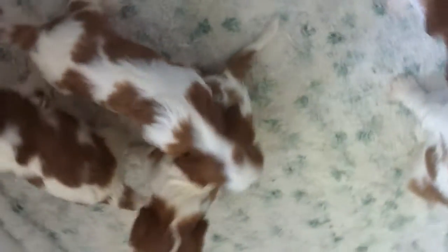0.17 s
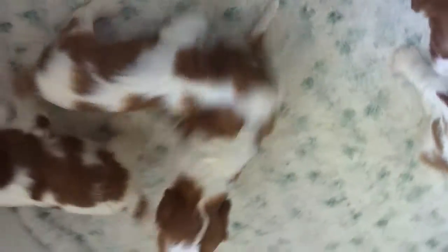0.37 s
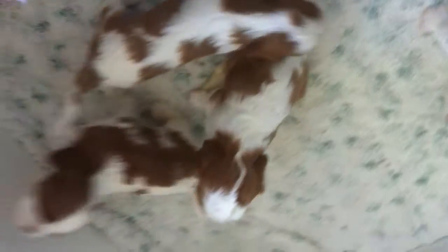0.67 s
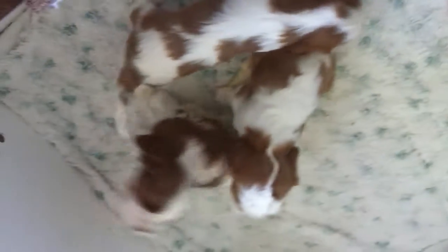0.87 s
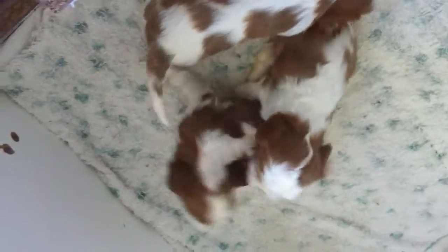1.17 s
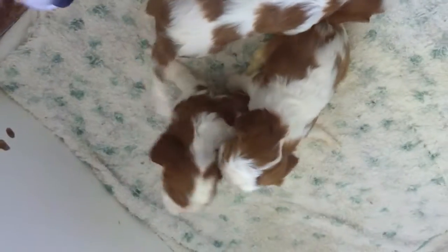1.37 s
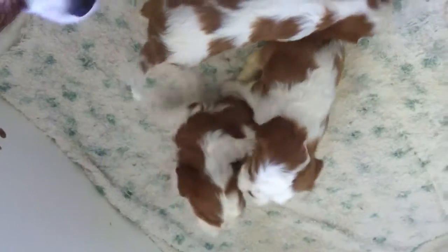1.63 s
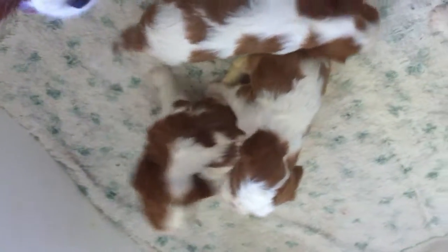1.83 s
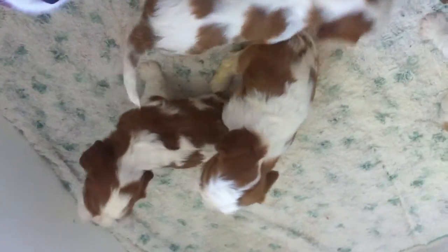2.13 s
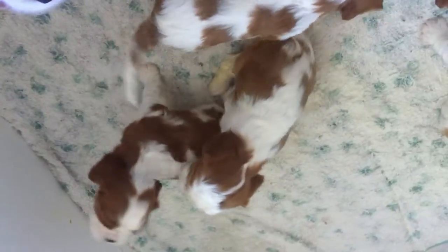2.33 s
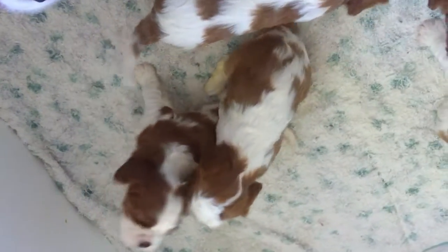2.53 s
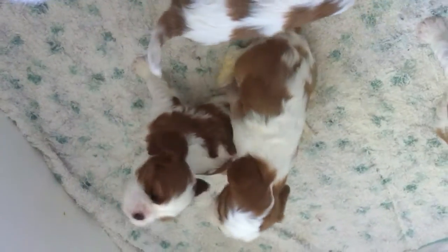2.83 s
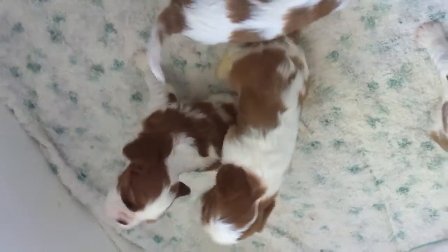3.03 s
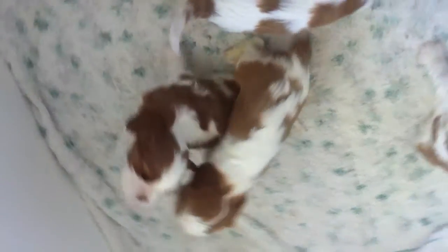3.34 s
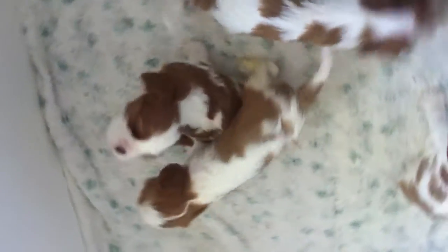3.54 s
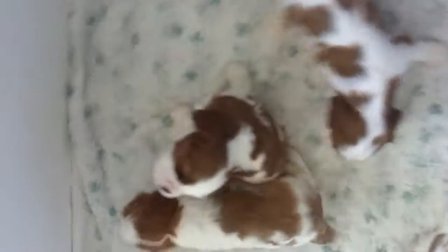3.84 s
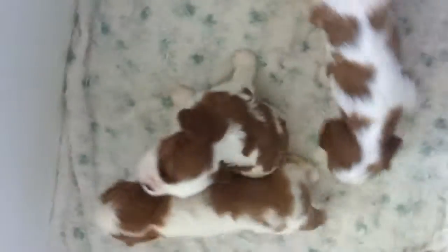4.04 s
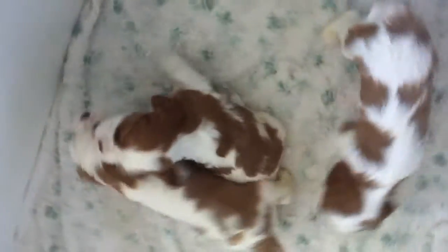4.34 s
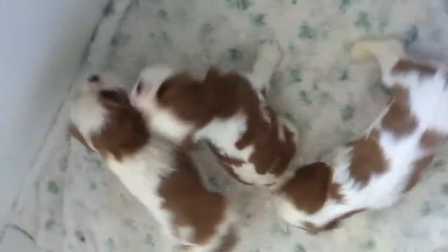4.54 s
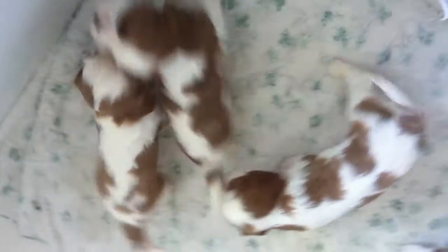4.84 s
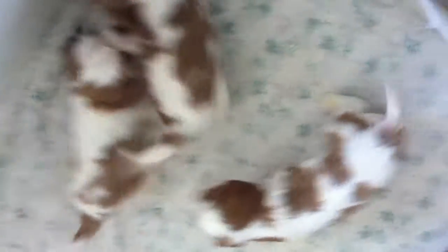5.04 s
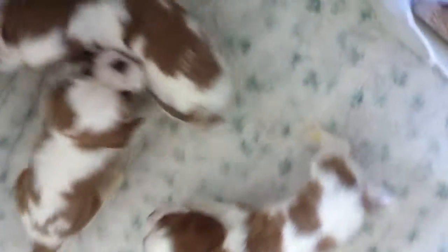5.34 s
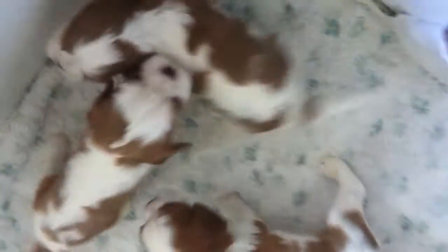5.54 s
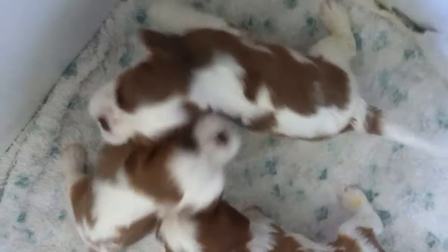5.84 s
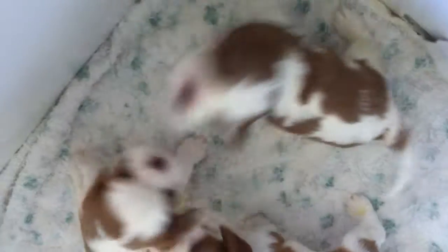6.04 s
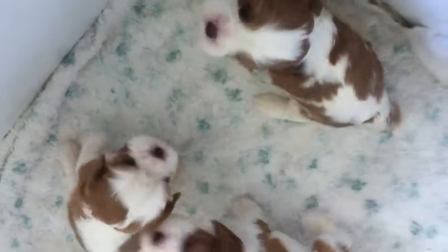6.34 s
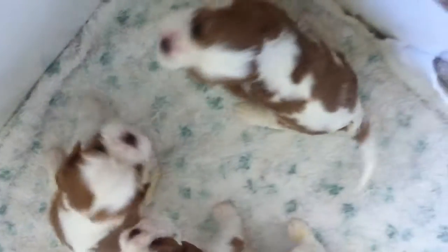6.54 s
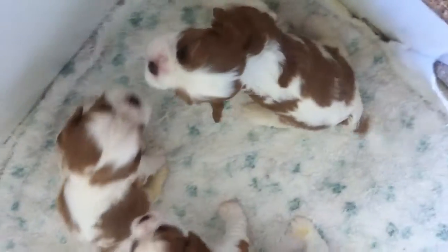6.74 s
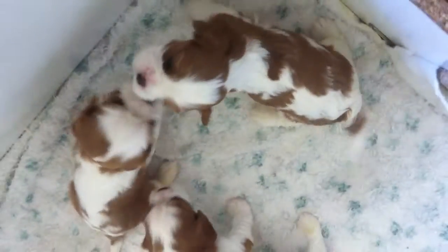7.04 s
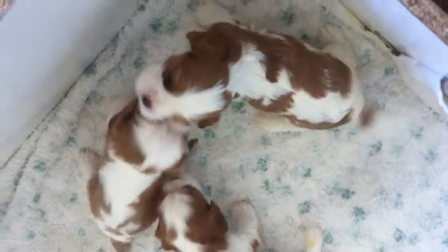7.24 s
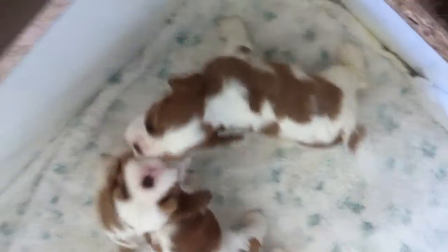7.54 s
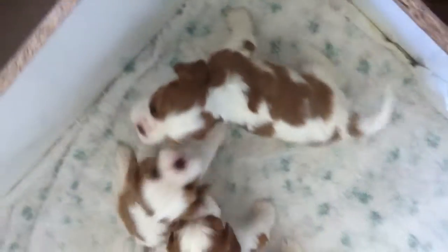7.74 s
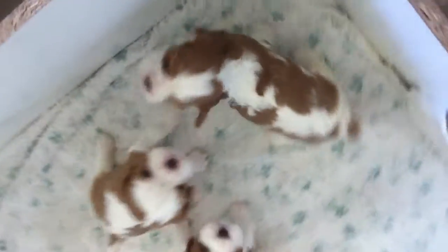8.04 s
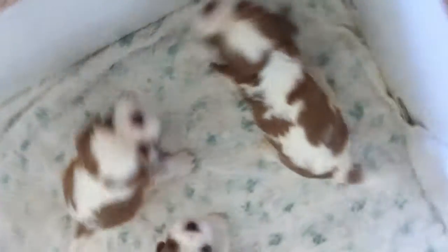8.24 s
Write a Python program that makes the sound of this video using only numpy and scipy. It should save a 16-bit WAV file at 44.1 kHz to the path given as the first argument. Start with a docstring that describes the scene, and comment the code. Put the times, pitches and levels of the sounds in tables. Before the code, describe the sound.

Young puppies squeal, yip and grunt close by, with quick breaths, soft shuffling on a blanket and a few sharp knocks.

```python
"""Young puppies cry, yip and pant in a whelping box indoors, the microphone just above them.
One squeals high at first, then they grunt and yelp: vocal folds buzz through the mouth,
and air rushes noisily through small airways between cries. Paws thud and scuff on the blanket
and a few sharp knocks ring briefly. The box walls throw the cries and bumps straight back,
with the short tail and still air of a furnished room behind."""
import sys
import numpy as np
from scipy import signal
from scipy.fft import rfft, irfft, next_fast_len
from scipy.io import wavfile
from scipy.ndimage import uniform_filter1d

SR = 44100
rng = np.random.default_rng(int(sys.argv[2]) if len(sys.argv) > 2 else 0)


def wav_record(signal):
    """Record a signal, one row per channel, as 16-bit PCM in the file named by sys.argv[1]."""
    frames = np.transpose(np.atleast_2d(signal))
    bounded = np.clip(frames, -1, 1)
    # unit amplitude maps onto the largest positive 16-bit level
    quanta = np.round(bounded * 32767).astype(np.int16)
    wavfile.write(sys.argv[1], SR, quanta)


N = 370440
TIME = np.arange(N) / SR
LOW_CUT_HZ, BAND_LIMIT_HZ = 38, 15750

# The still room behind the box. Each row: frequency in Hz, relative level in dB.
ROOM_TONE = [(25, -40), (65, -35), (140, 2.5), (250, -4.5), (600, -5), (1400, -7.5), (2400, -4), (3700, -7),
             (8000, -12.5), (15700, -20)]
# The room's tail. Each row: frequency in Hz, seconds to die by 60 dB.
ROOM_T60 = [(150, 0.27), (1000, 0.42), (2500, 0.5), (8000, 0.34), (15000, 0.022)]
# Box walls close around the microphone. Each row: delay in seconds, gain.
WALL_ECHOES = [(.0017, 0.65), (.0034, -0.0078), (.0056, 0.013), (.0093, 0.071), (0.0145, -.1),
               (0.02, -0.057)]

# Rumble of bodies and hiss of cloth. Each row: frequency in Hz, relative level in dB.
SHUFFLE_COLOUR = [(25, -33), (60, -52), (85, -15.5), (160, -4), (280, 1), (500, -8.5), (1000, -5),
                  (3000, -33)]
SCUFF_COLOUR = [(200, -9), (1000, 2.5), (2400, 3), (4000, -4.5), (6000, 0.5), (8200, 1), (11000, 1),
                (13500, -2.5), (15800, -5)]
# A body shifts. Each row: peak time and length in seconds, relative rumble and hiss in dB.
BODY_SHIFTS = [(0.096, 0.24, -89, -75), (0.58, 0.26, -71, -55.5), (1.162, 1, -68.5, -61.5),
               (1.734, 0.32, -71.5, -68.5), (2.924, 0.61, -68, -67), (3.619, 0.81, -83, -60.5),
               (4.245, 0.91, -68, -67.5), (4.804, 0.83, -68.5, -69.5), (5.355, 0.76, -61, -61.5),
               (6.2, 0.72, -69, -63), (7.191, 0.41, -80, -68), (7.807, 0.4, -62.5, -63),
               (8.292, 1, -69, -56.5)]
# A paw swipes the cloth. Each row: peak time in seconds, level in dB, half-length in seconds.
PAW_SWIPES = [(1.403, -53, 0.18), (3.46, -68, 0.012), (5.838, -54, 0.085), (6.324, -59, 0.024),
              (7.646, -64.5, 0.11), (8.13, -55, 0.022), (8.333, -46.5, 0.065)]
# Paws and bodies land. Each row: start in seconds, level in dB, pitch in Hz.
THUDS = [(.486, -51, 240), (0.613, -59, 210), (0.863, -50, 161), (0.913, -61, 85), (2.545, -59, 215),
         (2.677, -54.5, 368), (4.553, -56.5, 240), (5.122, -69, 105), (5.332, -48.5, 164),
         (5.839, -51, 172), (7.686, -49, 328), (7.738, -59, 261), (8.128, -57, 294), (8.22, -52, 240)]
# Hard knocks and claw taps. Each row: start in seconds, level in dB, hardness in dB per octave.
KNOCKS = [(.195, -63, 0), (1.213, -41, -11), (4.931, -47, -2), (5.212, -45, 16), (5.328, -23, 2),
          (5.408, -38.5, -4), (5.795, -58, -14), (6.575, -42.5, -6), (8.023, -47, 30)]
# The ring of a knock. Each row: frequency in Hz, relative level in dB, seconds to die by 60 dB.
KNOCK_MODES = [(1250, -12, .012), (2315, -5, .016), (2850, -5, .014), (4161, 0, .013), (4600, -3, .009),
               (5150, -2, .009), (6794, -12, .014), (8193, -17, .02)]

# The airway as a breath starts and as the mouth shuts. Each row: frequency in Hz, gain in dB.
AIRWAY_OPEN = [(200, -55), (700, -9), (1100, -3), (1350, 3), (1600, -2.5), (2300, -1), (2900, -8),
               (3500, -18), (4500, -46), (8000, -18), (11500, -25), (15800, -27)]
AIRWAY_SHUT = [(70, -45), (200, -20), (750, -5), (1150, -5), (1340, 11.5), (1550, 9.5), (2000, -37),
               (2380, -16), (2800, -17), (4200, -23), (8000, -27), (11500, -16), (15800, -39)]
# Breaths close to the microphone. Each row: start, peak and end in seconds, level in dB.
PANTS = [(-.03, 0.01, .15, -64), (0.769, 0.864, .88, -51.5), (1.372, 1.38, 1.715, -52),
         (1.918, 1.964, 2.23, -52), (2.432, 2.592, 2.78, -54.5), (2.942, 3.056, 3.28, -53),
         (3.384, 3.461, 3.76, -46.5), (4.047, 4.26, 4.29, -53.5), (4.658, 4.69, 4.84, -56.5),
         (4.923, 4.967, 5.11, -55), (5.16, 5.214, 5.32, -48.5), (5.485, 5.598, 5.75, -49.5),
         (5.863, 5.904, 6.14, -48), (6.292, 6.368, 6.42, -46.5), (6.649, 6.707, 6.72, -42.5),
         (6.763, 6.78, 6.91, -48.5), (7.096, 7.12, 7.28, -45.5), (7.407, 7.44, 7.6, -44.5),
         (7.835, 7.895, 8.14, -47)]

# Mouth resonances of a crying puppy. Each row: frequency in Hz, gain in dB.
MOUTH = [(70, -50), (200, -9), (450, -13), (650, -12.5), (900, 8.5), (1130, -9), (1400, 3), (1630, -7),
         (1950, 1.5), (2350, -4), (2650, -5.5), (3100, -27.5), (3900, -33)]
# Treble colour of the squeals and of the lower cries. Each row: frequency in Hz, gain in dB.
SQUEAL_TREBLE = [(2600, -23), (3400, -19.5), (3750, -1.5), (4150, -31), (5500, 1.5), (6200, -12), (7600, 2),
                 (9200, -5.5), (11200, 6), (12400, -9), (13600, -21), (14700, -33), (15800, -26)]
YELP_TREBLE = [(2800, -57), (3600, -23), (4400, -36), (5400, 8), (6900, -1.5), (8200, 14), (9300, -9),
               (10400, 6.5), (11800, -3.5), (13500, -32), (14700, -48), (15800, -36)]
# Short yips and grunts. Each row: start and length in seconds, start and end pitch in Hz, level in dB,
# strain in dB per octave, treble against the level in dB, roughness from 0 to 1.
YIPS = [(1.172, 0.022, 411, 494, -45.5, -1, -20, 0.1), (1.29, .092, 631, 575, -39.5, -1, -12, 0.19),
        (1.876, 0.038, 875, 786, -42.5, -2.5, -23.5, 0.24), (1.904, 0.033, 374, 338, -49.5, -13, -15, 0.3),
        (2.864, 0.037, 567, 519, -47, -1, -21, 0.88), (3.045, 0.084, 1170, 1030, -41.5, 21, -13, 0.65),
        (3.106, 0.072, 1304, 1167, -47, 12, -5.5, 0.36), (3.293, 0.035, 355, 358, -44.5, -4, -27, 0.51),
        (3.514, 0.14, 320.3, 274, -44, -1, -13.5, .33), (3.726, 0.044, 237.3, 268, -46, 0, -26, 0.47),
        (3.798, 0.041, 1026, 593, -49, -2, -34, 0.48), (4.029, 0.038, 960, 633, -48, -8, -25, 0.28),
        (4.275, 0.091, 820, 1074, -42.5, -6, -19, 0.6), (4.57, 0.0527, 462.4, 442, -41, 6.5, -19, 0.23),
        (4.869, 0.028, 1447, 1290, -41, -8, -27, 0), (4.891, 0.026, 499.6, 408, -43.5, 0.5, -23, 0.68),
        (5.11, 0.046, 513, 420.5, -33, 2.5, -17, 0.26), (5.332, .037, 265.6, 315, -37.5, -9, -18, 0.46),
        (5.564, 0.04, 384, 539, -39, -3.5, -32, 0.58), (7.387, .023, 922, 1040, -36.5, -1, -20, 0),
        (7.571, 0.069, 281.5, 247, -40.5, 1, -25, 0.3)]
# Yelps. Each row: start, length, time to the turn and half-width of the bend in seconds, start, turn
# and end pitch in Hz, level in dB, strain in dB per octave, treble against the level in dB,
# roughness from 0 to 1.
YELPS = [(0.0, 0.11, 0.052, 0.056, 878.5, 950, 938, -51.5, 12, -12.5, 0.68),
         (0.385, 0.11, 0.086, 0.097, 748, 1196, 1060, -44.5, 4, -19, 0.46),
         (3.44, 0.12, 0.027, 0.056, 1016, 1028, 994, -43.5, 10, -14.5, 0.49),
         (6.101, 0.12, 0.08, .029, 657, 768, 640, -36, 0.5, -14.5, 0.2),
         (6.378, 0.048, .027, 0.045, 1155, 848, 940, -31.5, -3.5, -24, 0.2),
         (6.413, .078, .049, .045, 410, 648, 552, -39, -3.5, -16.5, 0.4),
         (6.685, 0.086, .069, 0.042, 961, 1256, 1200, -36.5, 6, -15, .2),
         (7.3, .117, 0.054, .05, 642, 829, 775, -36, 0.5, -16, 0.22),
         (7.827, 0.12, 0.077, 0.05, 831.5, 993, 767, -38.5, -5.5, -23, 0.56)]
# The course of each long cry. Each row: time in seconds, pitch in Hz, relative mouth and treble in dB.
FIRST_SQUEAL = [(0.208, 1210, -45, -68), (0.22, 1220, -40.5, -61), (0.254, 1468, -44.5, -45),
                (0.274, 1537, -47, -44.5), (0.34, 1230, -40, -47.5), (0.358, 1360, -39.5, -56),
                (0.368, 1320, -55, -51)]
RISING_SQUEAL = [(0.53, 1360, -49, -58), (0.54, 1354, -43.5, -57), (0.592, 1613, -37, -34.5),
                 (0.606, 1760, -54, -34.5), (0.648, 1843, -39.5, -38.5), (0.69, 1978, -31.5, -53),
                 (0.704, 1820, -56, -53), (0.715, 2060, -33, -56)]
LONG_SQUEAL = [(0.86, 1188, -40.5, -54), (0.886, 1280, -28.5, -43), (0.936, 1546, -35.5, -36),
               (0.962, 1623, -36.5, -32.5), (0.988, 1798, -47.5, -34.5), (1.03, 1875, -30.5, -40.5),
               (1.062, 1785, -42, -42.5), (1.092, 1500, -34.5, -48), (1.124, 1487, -37.5, -48),
               (1.132, 1550, -33, -47)]
FIRST_WAIL = [(6.95, 806, -51, -63), (6.962, 888, -37, -43.5), (6.974, 916, -34.5, -50),
              (7.002, 1164, -30, -39), (7.03, 1180, -34.5, -39.5), (7.054, 1007, -29.5, -46.5),
              (7.08, 831.5, -35.5, -48), (7.12, 1027, -37.5, -58)]
LAST_WAIL = [(8.185, 985, -47, -63), (8.205, 981, -29, -47), (8.231, 1210, -33, -43),
             (8.271, 1357, -34, -42), (8.289, 1186, -36.5, -59), (8.301, 899, -39, -52),
             (8.312, 863, -36, -47)]
# The long cries. Each row: course, strain in dB per octave, roughness from 0 to 1.
SQUEALS = [(FIRST_SQUEAL, 10.7, 0.062), (RISING_SQUEAL, 1.4, 0.076), (LONG_SQUEAL, 15, 0.091)]
WAILS = [(FIRST_WAIL, 5.7, 0.071), (LAST_WAIL, 10, 0.21)]


def amp(db):
    """Decibels to gain."""
    return 10 ** (np.asarray(db) / 20)


def read(points, hz):
    """Reads a spectrum on a log-frequency axis."""
    f, value = np.transpose(points)
    return np.interp(np.log(hz + 1), np.log(f + 1), value)


def add(mix, start, sound):
    """Adds a sound into the mix at a start in seconds."""
    part = mix[max(round(start * SR), 0):][:len(sound)]
    part += sound[:len(part)]


def span(start, length):
    """Sample times of one sound."""
    return start + np.arange(int(length * SR)) / SR


def white(size):
    """White noise."""
    return rng.standard_normal(max(size, SR // 2))[:size]


def colour(x, points):
    """Filters by a spectrum, to rms 1."""
    length = next_fast_len(len(x))
    gain = amp(read(points, np.fft.rfftfreq(length, 1 / SR)))
    shaped = irfft(rfft(x, length) * gain, length)[:len(x)]
    return shaped / np.sqrt(np.mean(shaped ** 2) + 1e-20)


def noise(size, points):
    """Noise with a given spectrum."""
    return colour(white(size), points)


def wander(size, hz):
    """Random drift at up to about hz."""
    return np.interp(np.arange(size) * 2 * hz / SR, np.arange(2048), rng.standard_normal(2048))


def room_tone(level_db=-69.5):
    """The faint, steady air of the room."""
    return amp(level_db) * noise(N, ROOM_TONE)


def reflections(x, tail_db=-13, gap_s=0.006, echoes_per_s=3000):
    """Direct sound, near echoes from the box walls, then the short tail of a furnished room."""
    taps = rng.standard_normal(SR // 2) * (rng.random(SR // 2) < echoes_per_s / SR)
    hz, t, bands = signal.stft(taps, SR, nperseg=256)
    decay = amp(-60 * t / read(ROOM_T60, hz)[:, None])
    tail = signal.istft(bands * decay, SR, nperseg=256)[1]
    response = np.zeros(SR)
    response[0] = 1
    for delay, gain in WALL_ECHOES:
        add(response, delay, gain * np.array([1, 2, 1]) / 4)
    add(response, gap_s, amp(tail_db) * tail / np.linalg.norm(tail))
    return signal.fftconvolve(x, response / np.linalg.norm(response))[:N]


def blanket(lumps_db=4, scuff_db=-2, flicker_db=4, snags_per_s=110):
    """Bodies shift with a low rumble; fur and claws drag over cloth with a hiss and tiny snags."""
    weight, drag = amp(-73), amp(-70.5)  # small fidgeting that never stops
    for peak, length, weight_db, hiss_db in BODY_SHIFTS:
        move = np.exp(-(2 * (TIME - peak) / length) ** 2)
        weight = np.hypot(weight, amp(weight_db) * move)
        drag = np.hypot(drag, amp(hiss_db) * move)
    weight *= amp(lumps_db * wander(N, 8.4))
    drag *= amp(scuff_db)
    for peak, level_db, half_s in PAW_SWIPES:
        add(drag, peak - half_s, amp(level_db) * np.hanning(int(2 * half_s * SR)) ** 2)
    snags = 0.36 * np.minimum(rng.exponential(1, N), 3) * (rng.random(N) < snags_per_s / SR)
    tugs = signal.lfilter([1], [1, -0.98], snags)
    fibres = colour(white(N) * (1 + tugs), SCUFF_COLOUR)
    return weight * noise(N, SHUFFLE_COLOUR) + drag * amp(flicker_db * wander(N, 30)) * fibres


def thud(start, level_db, hz, rise_s=0.0077):
    """A soft push swells and dies in the padded floor."""
    t = np.arange(SR // 6) / SR
    rumble = noise(len(t), [(hz / 2, -20), (hz, 0), (hz * 10, -22)])
    swell = (t / rise_s * np.exp(1 - t / rise_s)) ** 2
    return start, amp(level_db) * swell * (np.sin(2 * np.pi * hz * t) + 0.75 * rumble)


def knock(start, level_db, hardness, crack_s=0.00031):
    """A brief crack and a few fast-dying modes; a soft blow favours the low ones."""
    t = np.arange(SR // 8) / SR
    spot = 1 + rng.uniform(-0.1, 0.1)  # every spot of the box rings a little higher or lower
    ring = np.zeros(len(t))
    for hz, db, t60 in KNOCK_MODES:
        decay = amp(db + hardness * np.log2(hz / 4000) - 60 * t / t60)
        ring += decay * np.sin(2 * np.pi * (hz * spot * t + rng.random()))
    crack = noise(len(t), [(100, -9), (1500, -22), (5000, 2 * hardness), (15000, 4 * hardness - 10)])
    return start, amp(level_db) * (ring / 2 + 0.51 * np.exp(-t / crack_s) * crack)


def pant(start, peak, end, level_db, flutter_db=2, ends_db=-11):
    """Air rushes through a small airway whose upper resonance fades as the mouth closes."""
    t = np.arange(start, end, 1 / SR)
    shut = np.linspace(0, 1, len(t))
    air = np.sqrt(1 - shut) * noise(len(t), AIRWAY_OPEN) + np.sqrt(shut) * noise(len(t), AIRWAY_SHUT)
    swell_db = np.interp(t, [start, peak, end], [ends_db, 0, ends_db])
    flow = amp(level_db + swell_db + flutter_db * wander(len(t), 37.8))
    return start, air * flow * signal.windows.tukey(len(t), 0.15)


def blend(harmonics, gains, puffs, spectrum, air_share):
    """The folds' harmonics and the escaping air, coloured and mixed at constant power."""
    tone = (gains * harmonics).sum(0) / np.sqrt((gains ** 2).sum(0) / 2)
    air_share = np.clip(air_share, 0, 1)
    return np.sqrt(1 - air_share ** 2) * tone + air_share * colour(puffs, spectrum)


def voice(hz, level_db, treble_db, strain, rough, treble_colour, treble_air, ring_db,
          ring_hz=2170, ring_width_hz=670, catch_s=0.024, shimmer_db=2,
          attack_s=0.0012, release_s=0.003, closing_db=-4, closing_s=0.0087):
    """Vocal folds buzz through the mouth; strain brightens the tone, roughness shakes it."""
    t = np.arange(len(hz)) / SR
    left_s = t[-1] - t
    # the folds beat unevenly as they catch and as they let go
    catch = 0.27 * np.exp(-np.minimum(t, left_s) / catch_s)
    rough = np.clip(rough + catch, 0, 1) ** 1.5
    jitter = (0.011 + 0.077 * rough) * wander(len(t), 230)
    cycles = np.cumsum(hz * (1 + jitter)) / SR
    k = np.arange(1, int(BAND_LIMIT_HZ / hz.min()) + 1)[:, None]
    harmonics = np.cos(2 * np.pi * (k * cycles + rng.random((100, 1))[:len(k)]))
    # low grunts are duller on top than high yelps
    tilt = 4 * min(np.log2(hz.mean() / 1000), 0)
    top = [(f, db + tilt * np.log2(f / 8000)) for f, db in treble_colour]
    mouth_db = read(MOUTH, k * hz) + strain * np.log2(np.minimum(k * hz, 2600) / 1500)
    # the wide-open mouth rings and picks out the nearest harmonic
    mouth_db += ring_db * np.exp(-((k * hz - ring_hz) / ring_width_hz) ** 2)
    # air escapes in a puff at every opening of the folds
    puffs = (1 + np.cos(2 * np.pi * cycles)) * white(len(t))
    rasp = 0.94 * rough
    low = blend(harmonics, amp(mouth_db), puffs, MOUTH, rasp)
    treble = blend(harmonics, amp(read(top, k * hz)), puffs, top, treble_air + rasp)
    # now and then strong and weak beats alternate, putting tones between the harmonics
    treble *= 1 + 0.11 * wander(len(t), 26.3) * np.cos(np.pi * cycles)
    treble *= amp(closing_db * np.exp(-left_s / closing_s))  # dies first as the mouth closes
    fade = np.minimum(t / attack_s, 1) * np.minimum(left_s / release_s, 1)
    shimmer = amp(shimmer_db * wander(len(t), 109.9))
    return fade * shimmer * (amp(level_db) * low + amp(treble_db) * treble)


def yip(start, length, start_hz, end_hz, level_db, strain, treble_db, rough, strain_per_db=1.38):
    """One push of air: the voice peaks early, brightening as it swells, and slides up or down."""
    progress = span(0, length) / length
    arch = 0.03 * (np.sin(np.pi * progress) - 2 / np.pi)  # the push lifts the pitch in mid-yip
    hz = (start_hz + (end_hz - start_hz) * progress) * (1 + arch)
    push_db = np.interp(progress, [0, 0.41, 1], [-4, 0, -4])
    force_db = level_db + push_db
    return start, voice(hz, force_db, force_db + treble_db, strain + strain_per_db * push_db,
                        rough, YELP_TREBLE, treble_air=0.15, ring_db=2)


def yelp(start, length, turn_s, bend_s, start_hz, turn_hz, end_hz, level_db, strain, treble_db, rough,
         rise_s=0.016, fall_s=0.03):
    """The voice swells, holds and falls away; pitch and mouth follow one smooth bend."""
    t = span(0, length)
    bend = np.cos(np.pi / 2 * np.clip((t - turn_s) / bend_s, -1, 1)) ** 2
    hz = turn_hz * bend + np.where(t < turn_s, start_hz, end_hz) * (1 - bend)
    onset_db = -5.5 * np.maximum(1 - t / rise_s, 0)
    ending_db = -9 * np.maximum(1 - (length - t) / fall_s, 0)
    force_db = level_db + onset_db + ending_db
    opening_db = 5 * (bend - 0.5)  # more treble as the mouth opens at the turn
    return start, voice(hz, force_db, force_db + treble_db + opening_db, strain,
                        rough, YELP_TREBLE, treble_air=0.1, ring_db=5.5)


def long_cry(course, strain, rough, treble_colour, treble_air, mouth_gain_db=0, treble_gain_db=-1.5):
    """A drawn-out squeal or wail that wavers in pitch and force."""
    times, *columns = np.transpose(course)
    t = span(times[0], times[-1] - times[0])
    hz, level_db, treble_db = (
        uniform_filter1d(np.interp(t, times, column), size=400, mode="nearest") for column in columns)
    return times[0], voice(hz, level_db + mouth_gain_db, treble_db + treble_gain_db, strain,
                           rough, treble_colour, treble_air, ring_db=0.5)


def scene():
    """From just above the box: cries, breaths, knocks and thuds over the blanket and the still room."""
    box = np.zeros(N)
    for row in SQUEALS:
        add(box, *long_cry(*row, SQUEAL_TREBLE, treble_air=0.29))
    for row in WAILS:
        add(box, *long_cry(*row, YELP_TREBLE, treble_air=0.18, mouth_gain_db=0.5))
    for source, table in (yelp, YELPS), (yip, YIPS), (pant, PANTS), (knock, KNOCKS), (thud, THUDS):
        for row in table:
            add(box, *source(*row))
    return (reflections(box) + blanket() + room_tone())[None]


def record(dry):
    """One microphone with a bass cut, then a steep limit on the highest treble."""
    bass_cut = signal.butter(2, LOW_CUT_HZ, "highpass", fs=SR, output="sos")
    band_limit = signal.firwin(511, BAND_LIMIT_HZ, window=("kaiser", 9), fs=SR)
    return signal.oaconvolve(signal.sosfilt(bass_cut, dry), band_limit[None], "same")


dry = scene()
out = record(dry)
wav_record(out)
```